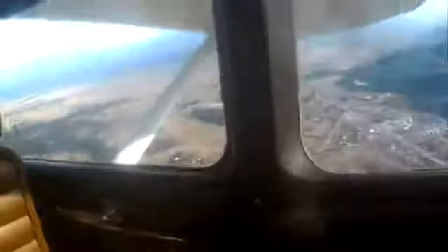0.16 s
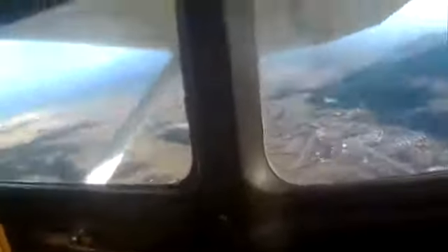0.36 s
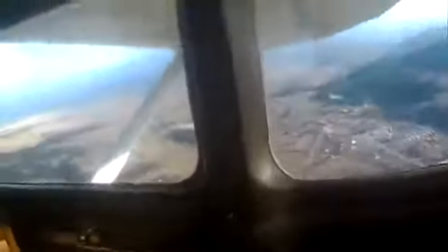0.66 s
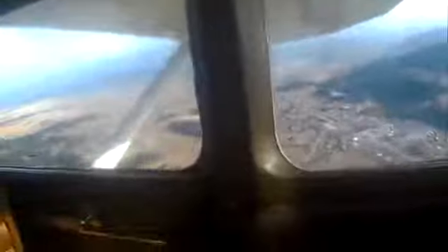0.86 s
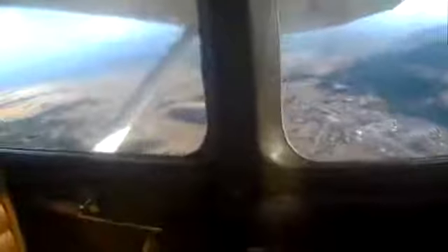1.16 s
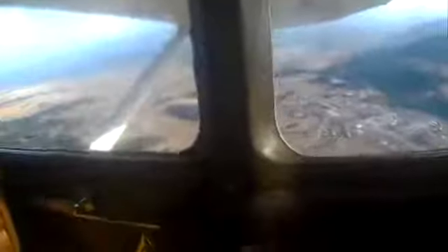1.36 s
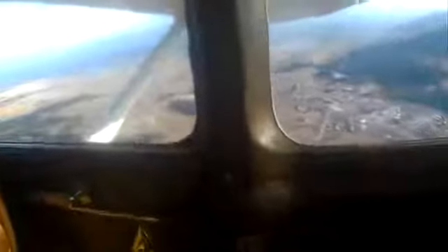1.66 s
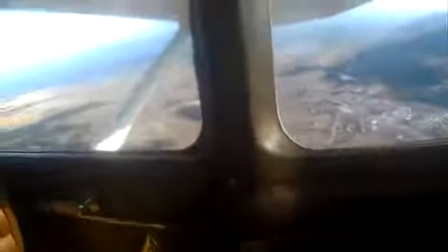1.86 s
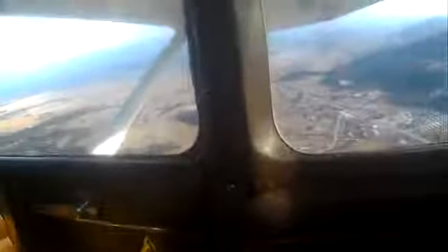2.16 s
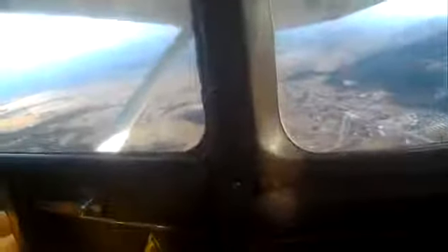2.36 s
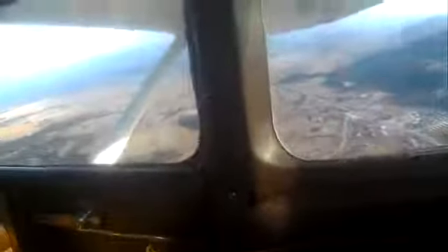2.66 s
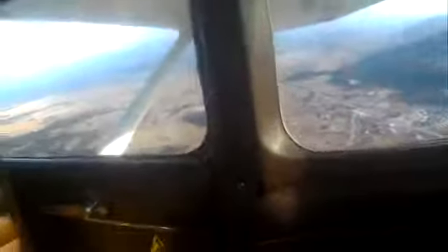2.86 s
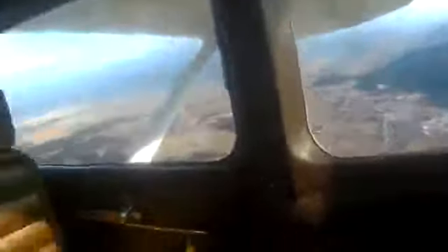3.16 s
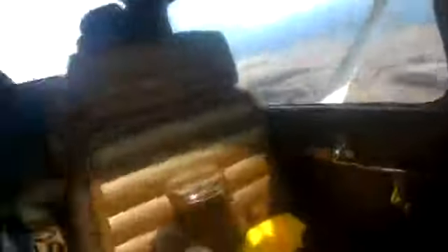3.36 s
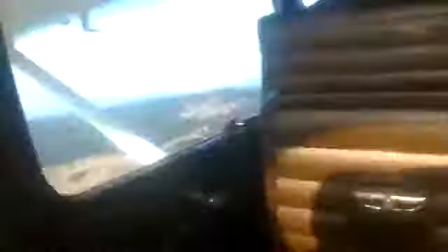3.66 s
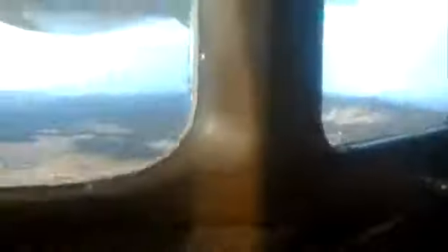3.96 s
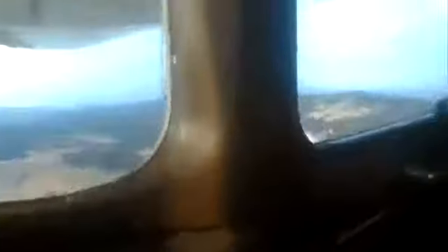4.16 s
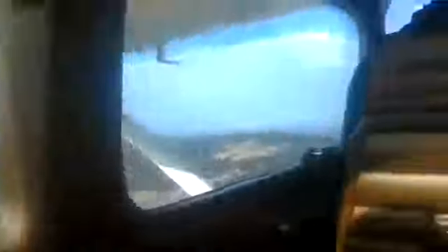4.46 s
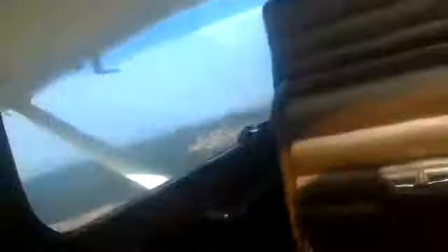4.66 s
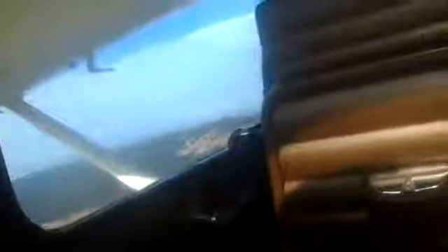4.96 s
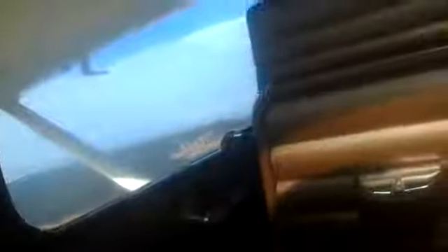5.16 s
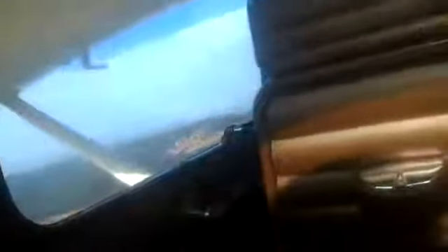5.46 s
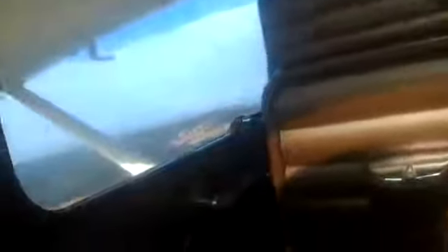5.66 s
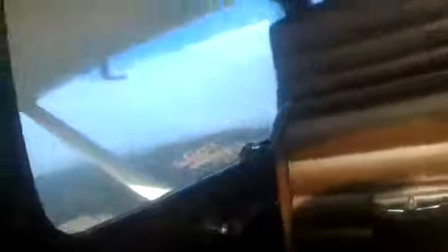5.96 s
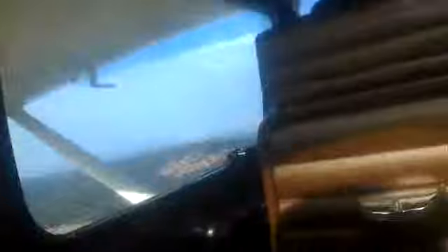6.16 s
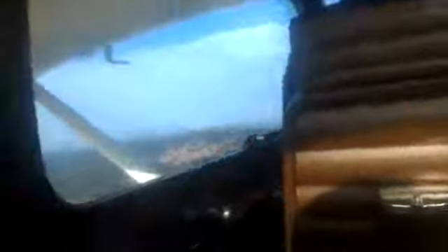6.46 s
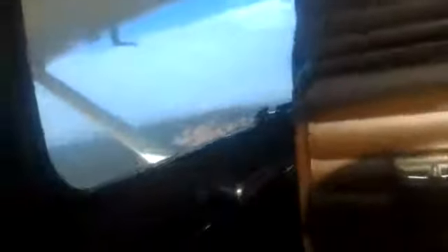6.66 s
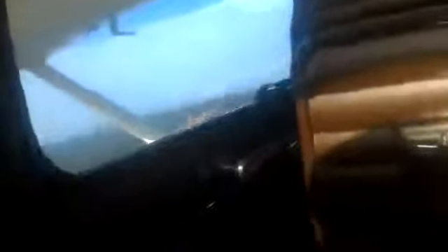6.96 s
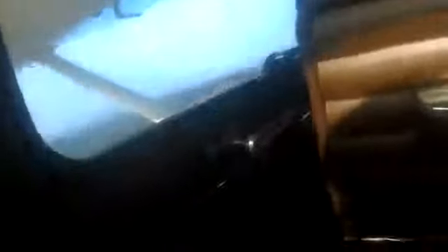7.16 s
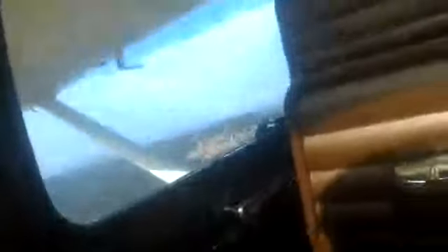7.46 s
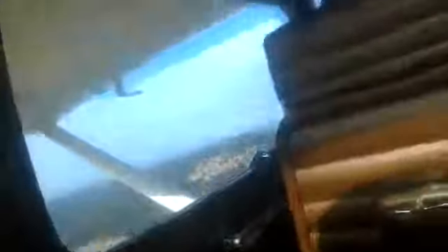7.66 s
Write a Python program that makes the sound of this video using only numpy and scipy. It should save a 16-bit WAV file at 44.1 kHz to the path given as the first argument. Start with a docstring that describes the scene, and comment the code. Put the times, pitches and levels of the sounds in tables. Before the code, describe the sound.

A small propeller airplane's engine drones loudly for the whole eight seconds or so, heard from inside the cabin in cruise. The low hum holds an almost constant pitch, with a fast propeller buzz and a broad, slightly fluttering roar of rushing air. A small hand-held microphone overloads throughout, giving everything a rough, distorted edge. For the first three seconds, a door panel adds an uneven growl within the drone. Between about 3.2 and 3.7 seconds the microphone swings to the opposite window: the propeller turns harsher and buzzier, the growl recedes, and a faint hiss of air leaks through the door seal. This tone holds to the end, softening briefly around 7 seconds. Two tiny handling ticks fall at about 1.5 and 4.5 seconds, nearly buried in the engine noise.

```python
"""A two-blade propeller and six-cylinder engine drone in cruise, heard from a light aircraft's cabin.
Blade passes, exhaust firings and slipstream roar overload a small hand-held microphone, whose input
flattens the crests. A door panel growls, a seal hisses, and the hand ticks twice on the case.
Halfway the microphone is swung from one side window to the other and the drone changes colour."""
import sys
import numpy as np
from scipy import signal
from scipy.fft import rfft, irfft
from scipy.io import wavfile

SR = 44100
rng = np.random.default_rng(int(sys.argv[2]) if len(sys.argv) > 2 else 0)


def unload_wav(signal):
    """Save mono or channel-first audio to the path in sys.argv[1] as 16-bit WAV at rate SR, clipped to [-1, 1]."""
    wavfile.write(
        sys.argv[1],
        SR,
        np.round(np.clip(np.atleast_2d(signal).T, -1, 1) * 32767).astype(np.int16),
    )


N = 344421

# The microphone's path across the cabin. Each row: time in seconds, place
# (0 at the first window, 1 at the second, above 1 closer to its pane).
MIC_PATH = [(0, 0.074), (2.8, 0.019), (3.2, 0), (3.5, 0.54), (3.7, 1.11), (4.1, 1.23), (5.2, 0.94),
            (5.8, 1.07), (6.9, 0.66), (7.2, 0.92), (7.81, 1.03)]
# Engine speed. Each row: time in seconds, four-stroke cycles (two crank turns each) per second.
CYCLE_RATE = [(0, 19.042), (1.5, 19.05), (2.7, 19.05), (3.2, 19.025), (3.8, 19.07), (4.6, 19.085),
              (6.1, 19.075), (6.6, 19.115), (7.81, 19.11)]
# Tones of the propeller, then of the exhaust and engine mounts.
# Each row: multiple of the cycle rate, level in dB at the first window, level in dB at the second.
BLADE_TONES = [(4, -1, -1), (8, -19, -7), (12, -29.5, -7)]
ENGINE_TONES = [(2, -26.5, -33), (3, -12, -12), (5, -17.5, -40), (6, -3.5, -4), (7, -13, -21),
                (9, -19, -16), (10, -18.5, -31.5), (13, -26.5, -22.5), (14, -27.5, -27.5),
                (16, -32.5, -18.5), (18, -28, -13), (20, -30, -22.5), (22, -22.5, -11), (24, -21, -24),
                (26, -14, -23), (27, -13, -25.5), (28, -16, -15.5), (30, -17, -21.5), (31, -30.5, -19),
                (32, -20.5, -21.5), (34, -29.5, -18.5), (36, -23, -30), (37, -25, -29.5), (38, -38, -26),
                (42, -21.5, -36), (44, -37.5, -30.5), (46, -36.5, -27), (60, -32.5, -30), (62, -26, -33)]
# The slipstream as heard through the cabin skin. Each row: frequency in Hz, relative level in dB.
ROAR_SPECTRUM = [(15, -6), (60, -2), (250, 0), (520, 0), (900, -7), (1600, -16), (3000, -24), (6000, -31),
                 (16000, -39)]
# The hand on the microphone case. Each row: start in seconds, level in dB, brightness from 0 to 1.
HAND_TICKS = [(1.5255, -2, 0.2), (4.5166, -3, 0.6)]
# The microphone's colour after its overloaded input. Each row: frequency in Hz, gain in dB.
MIC_COLOUR = [(15, -22), (60, -24), (200, -19), (550, -18.5), (900, -14.5), (1150, -11), (1400, -5.5),
              (1700, -10.5), (2050, -6), (2500, -8.5), (3050, 0.5), (3700, -17), (4400, -18.5),
              (5600, -37.5), (6050, -62.5), (6350, -41.5), (7600, -43.5), (7950, -59), (8800, -39),
              (11000, -30.5), (15000, -38)]

# Each pair: dB at the first window, dB at the second. The drive adds to every cabin level.
SLAP_DB, ROAR_DB = (-10, 1.5), (-8.5, -7.5)
PANEL_DB, LEAK_DB = (-16, -21), (-48, -32)
DRIVE_DB = (0.5, 1)
GUST_DB = 0.62   # depth of the gusts in roar and leak


def from_db(db):
    """Decibels to gain."""
    return 10 ** (np.asarray(db) / 20)


def rms_one(x):
    """Scale to rms 1."""
    return x / np.sqrt(np.mean(x ** 2) + 1e-20)


def heard_at(place, pair):
    """Blend a first-window and a second-window value for the microphone's place."""
    return pair[0] + place * (pair[1] - pair[0])


def drift(rate_hz):
    """Slow random wander of rms 1: coarse noise through a double one-pole low-pass."""
    step, settle = 40, 2000
    pole = np.exp(-2 * np.pi * rate_hz * step / SR)
    noise = rng.standard_normal(N // step + settle + 2)
    slow = signal.lfilter([1], [1, -2 * pole, pole * pole], noise)[settle:]
    return np.interp(np.arange(N) / step, np.arange(len(slow)), rms_one(slow))


def coloured(x, curve, size=8192):
    """Minimum-phase filter along a curve of Hz and dB, made by folding the cepstrum."""
    curve_hz, curve_db = np.transpose(curve)
    hz = np.maximum(np.arange(size // 2 + 1) * SR / size, 1)
    gain_db = np.interp(np.log(hz), np.log(curve_hz), curve_db)
    cepstrum = irfft(np.log(from_db(gain_db)))
    cepstrum[1:size // 2] *= 2
    cepstrum[size // 2 + 1:] = 0
    return signal.fftconvolve(x, irfft(np.exp(rfft(cepstrum))))[:N]


def drone(tones, cycle_angle, place, phase, waver_db=0.97, waver_rad=0.16):
    """Sines locked to the engine cycle, each wavering on its own in level and phase."""
    out = np.zeros(N)
    for multiple, *window_db in tones:
        level_db = heard_at(place, window_db) + waver_db * drift(2.45)
        out += from_db(level_db) * np.sin(multiple * cycle_angle + phase + waver_rad * drift(4.5))
    return out


def propeller(cycle_angle, place, lag_s=0.0007, jitter_s=0.00024, decay_s=0.00057, spread_db=8.5):
    """The blades hum, and each pass slaps the pane with a steep pressure front that dies at once."""
    hum = drone(BLADE_TONES, cycle_angle, place, phase=-0.75)
    passes = np.flatnonzero(np.diff(np.floor(cycle_angle / (np.pi / 2))))   # four to a cycle
    timing, strength = rng.standard_normal((len(passes), 2)).T
    delays = ((lag_s + jitter_s * timing) * SR).astype(int)
    arrivals = np.clip(passes + delays, 0, N - 1)
    fronts = np.zeros(N)
    fronts[arrivals] = from_db(heard_at(place[arrivals], SLAP_DB) + spread_db * strength)
    slaps = signal.lfilter([1], [1, -np.exp(-1 / (decay_s * SR))], fronts)
    slaps = signal.lfilter(*signal.butter(2, 1360, fs=SR), slaps)   # the pane rounds the edge
    return hum + slaps - slaps.mean()


def engine(cycle_angle, cycle_hz, place, lag_s=0.00067):
    """Exhaust and engine mounts carry six firings a cycle into the cabin, just behind the crank."""
    firing_angle = cycle_angle - 2 * np.pi * cycle_hz * lag_s
    return drone(ENGINE_TONES, firing_angle, place, phase=1.0)


def slipstream(place, buffet_db=1.07):
    """Turbulent air on skin and windows: broad noise in slow gusts and quick buffets."""
    level_db = heard_at(place, ROAR_DB) + GUST_DB * drift(4.7) + buffet_db * drift(19.0)
    return from_db(level_db) * rms_one(coloured(rng.standard_normal(N), ROAR_SPECTRUM))


def door_panel(place, band_hz=(492, 652), surge_db=1.5):
    """Drummed by the slipstream, a door panel growls in uneven surges, louder at the first window."""
    resonance = signal.butter(1, band_hz, "band", fs=SR, output="sos")
    growl = signal.sosfilt(resonance, rng.standard_normal(N))
    return from_db(heard_at(place, PANEL_DB) + surge_db * drift(15.8)) * rms_one(growl)


def seal_leak(place, above_hz=8000):
    """A draught hisses through the door seal, louder at the second window."""
    treble = signal.butter(2, above_hz, "high", fs=SR, output="sos")
    hiss = signal.sosfilt(treble, rng.standard_normal(N))
    return from_db(heard_at(place, LEAK_DB) + GUST_DB * drift(3.0)) * rms_one(hiss)


def hand_ticks(decay_s=0.0012):
    """The hand ticks right on the microphone case: short bursts of bright noise."""
    out, length = np.zeros(N), round(0.006 * SR)
    fade = np.exp(-np.arange(length) / (decay_s * SR))
    for start_s, level_db, brightness in HAND_TICKS:
        burst = signal.lfilter([1, -brightness], [1], rng.standard_normal(length))
        start = round(start_s * SR)
        out[start:start + length] = from_db(level_db) * burst * fade
    return out


def scene():
    """Pressure at the microphone as it crosses the cabin; the input overloads at 1."""
    t = np.arange(N) / SR
    place = np.interp(t, *np.transpose(MIC_PATH))
    cycle_hz = np.interp(t, *np.transpose(CYCLE_RATE))
    cycle_angle = 0.175 + 2 * np.pi * np.cumsum(cycle_hz) / SR
    machinery = propeller(cycle_angle, place) + engine(cycle_angle, cycle_hz, place)
    air = slipstream(place) + door_panel(place) + seal_leak(place)
    drive = from_db(heard_at(place, DRIVE_DB))
    return (drive * (machinery + air) + hand_ticks())[None]


def record(dry, hiss_db=-38.5, cutoff_hz=15100):
    """The input clips hard and hisses; a presence lift and steep treble fall follow, then a top cut."""
    overloaded = np.clip(dry[0], -1, 1) + from_db(hiss_db) * rng.standard_normal(N)
    top_cut = signal.ellip(12, 0.5, 60, cutoff_hz, fs=SR, output="sos")
    return signal.sosfilt(top_cut, coloured(overloaded, MIC_COLOUR))[None]


dry = scene()
out = record(dry)
unload_wav(out)
```